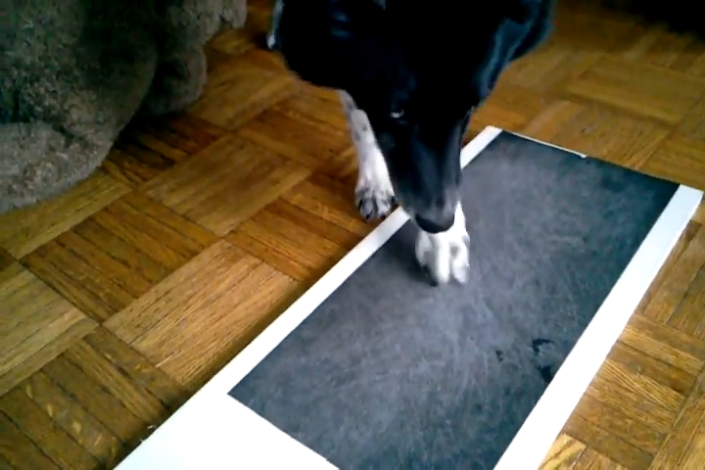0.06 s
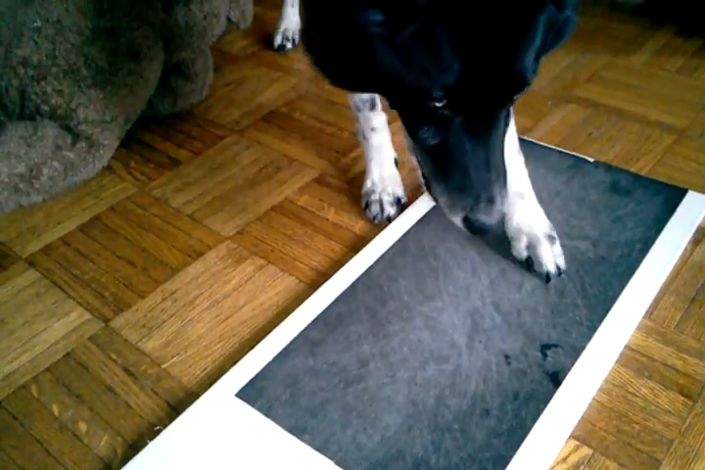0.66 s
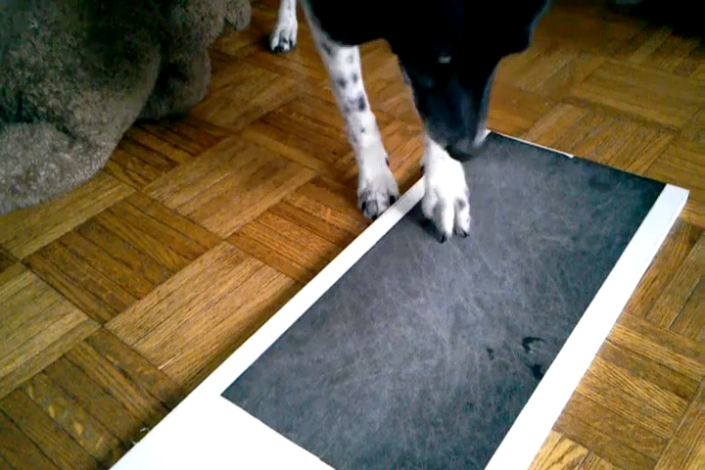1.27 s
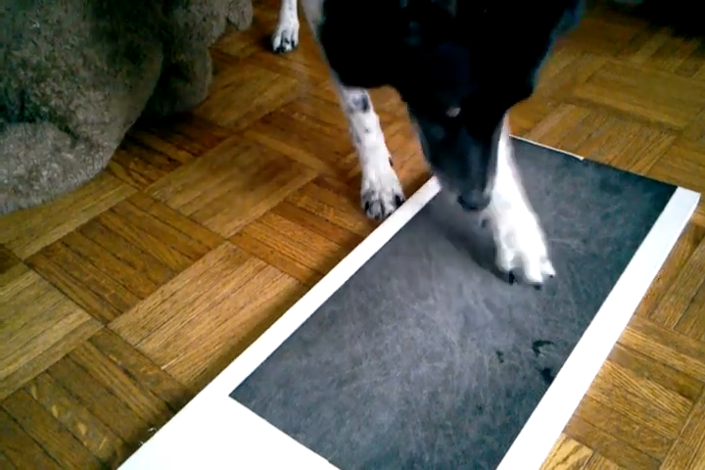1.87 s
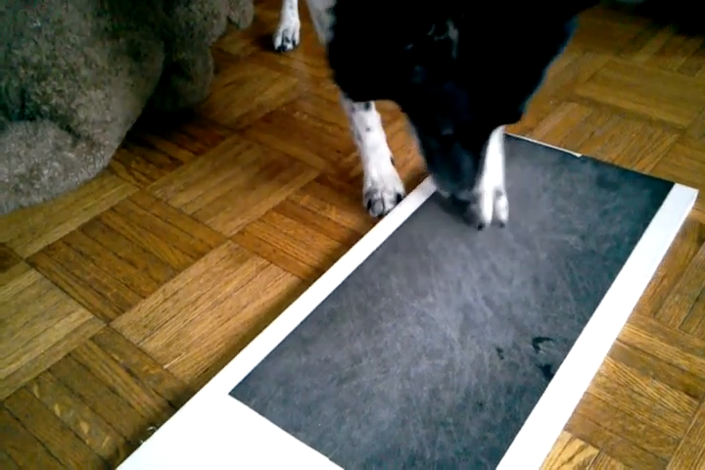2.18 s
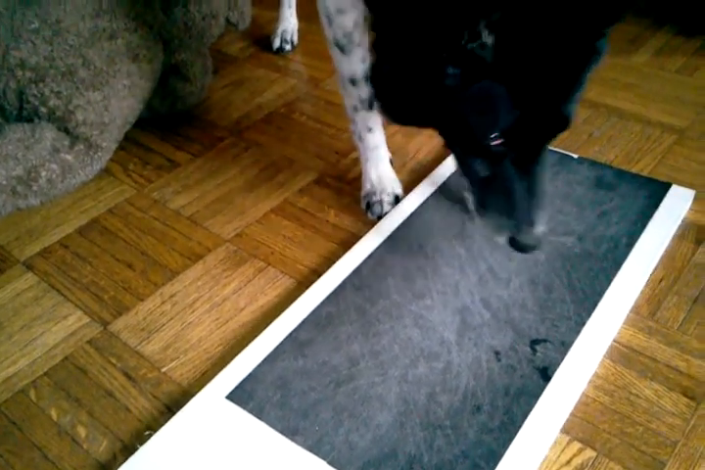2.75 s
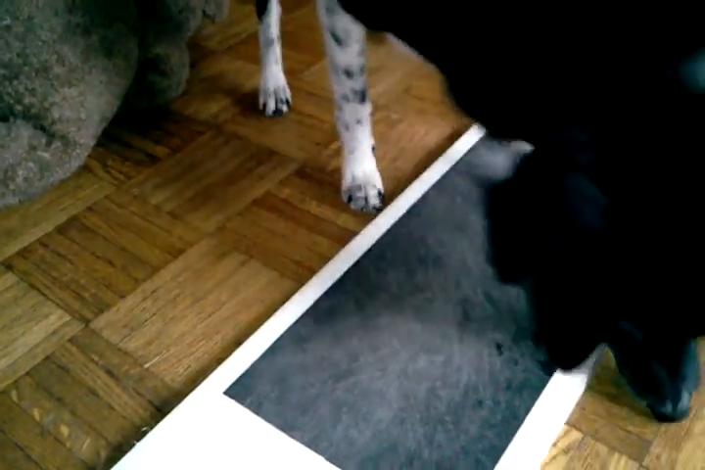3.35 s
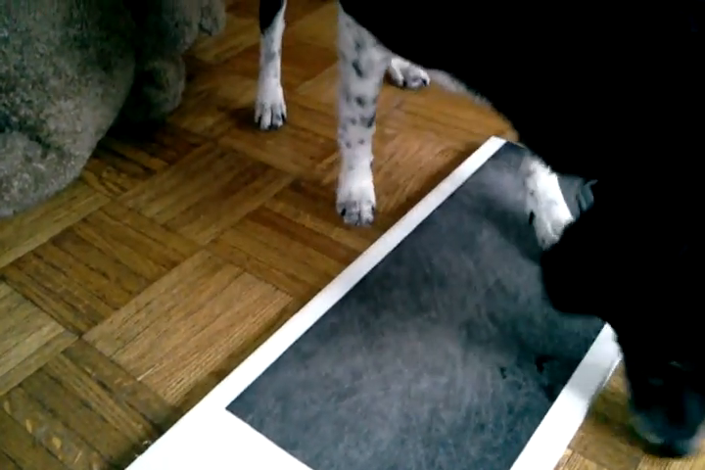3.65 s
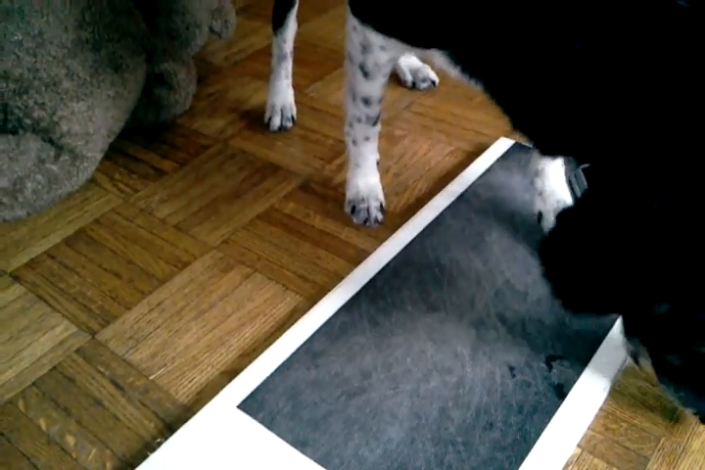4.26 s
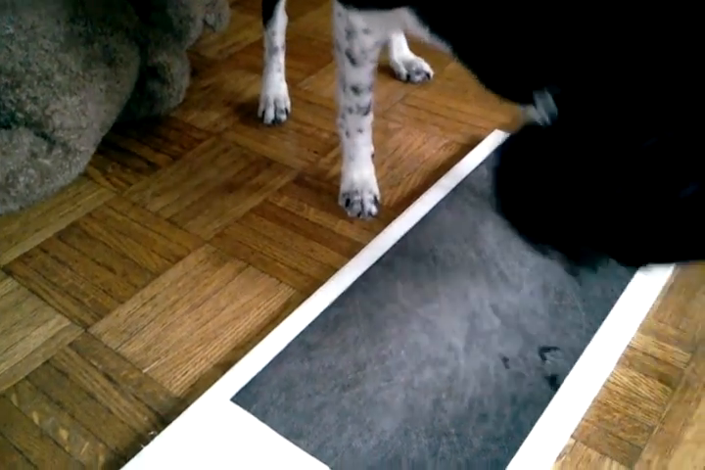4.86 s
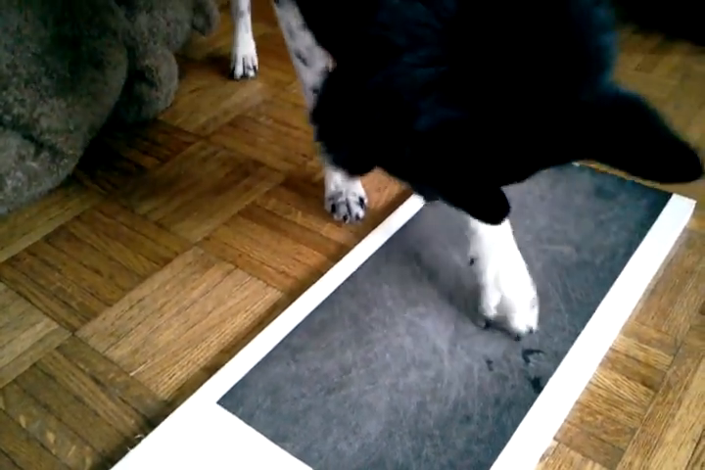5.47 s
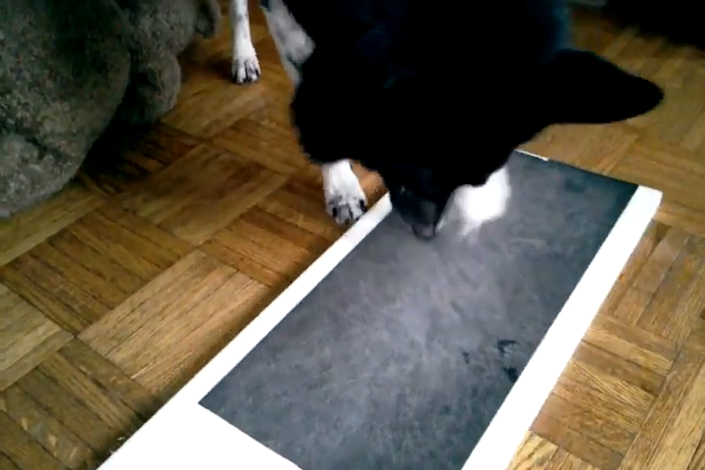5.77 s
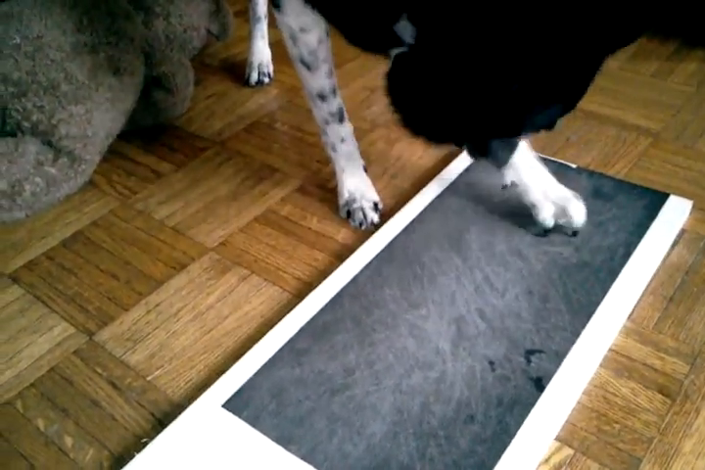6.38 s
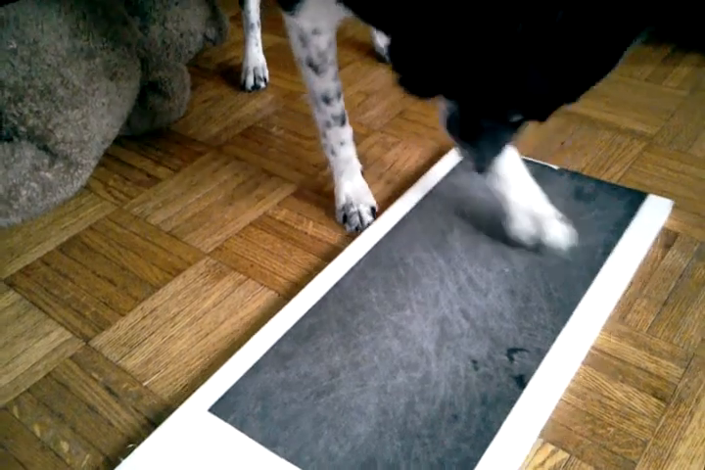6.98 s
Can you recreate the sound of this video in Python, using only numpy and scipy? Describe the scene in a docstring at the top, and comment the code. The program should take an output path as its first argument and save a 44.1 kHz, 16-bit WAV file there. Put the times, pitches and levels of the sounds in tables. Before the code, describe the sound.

A dog scratches one paw over a sandpaper board in two bouts of quick gritty scrapes and claw taps, in a small room.

```python
"""A small room with a parquet floor: a dog rakes one front paw over a sandpaper-covered board, in two bouts.
The claws tap down, grind through the grit in quick slips that set the board ringing, then brush off.
The pads rub softly. The room rings briefly over a steady rumble and hiss.
The hardest strokes overload a narrow-band microphone."""
import sys
import numpy as np
from scipy import signal
from scipy.fft import rfft, irfft
from scipy.io import wavfile

SR = 44100
rng = np.random.default_rng(int(sys.argv[2]) if len(sys.argv) > 2 else 0)


def dump(signal):
    """Clip the signal to [-1, 1] and save it as 16-bit WAV at the path in sys.argv[1]."""
    limited = np.clip(np.atleast_2d(signal).T, -1, 1)
    pcm = np.round(limited * 32767).astype(np.int16)
    wavfile.write(sys.argv[1], SR, pcm)


N = 310023

# Background spectrum. Each row: frequency in Hz, relative density in dB.
BACKGROUND_SPECTRUM = [(12, -38), (20, -12), (131, -5), (160, -5), (307, -13), (348, -11.5), (405, -13),
                       (605, -14), (652, -17.5), (950, -12), (1100, -17), (1190, -14.5), (2120, -23),
                       (4490, -26.5), (8000, -34.5), (10400, -71), (17600, -120)]
# Room decay. Each row: frequency in Hz, time to fall 60 dB in seconds.
ROOM_DECAY = [(300, 0.49), (800, 0.41), (2100, 0.31), (5500, 0.3), (8000, 0.32)]
# Board modes. Each row: centre in Hz, width in Hz, relative level in dB.
BOARD_MODES = [(635, 96, -0.5), (796, 270, -8.5), (885, 54, -8), (1027, 157, -2), (1160, 47, -16),
               (1353, 120, -5.5), (1470, 98, -8.5), (1704, 114, -5), (1730, 250, -4.5), (1953, 320, 0),
               (2210, 102, -4.5), (2670, 195, 1), (2980, 230, -8.5)]
# Colour of a claw on grit. Each row: frequency in Hz, relative level in dB.
CLAW_SPECTRUM = [(100, -22), (600, -38.5), (1500, -7), (2400, -3.5), (3100, -5.5), (3400, -6.5), (3750, -1),
                 (4100, -1.5), (4550, 0.5), (5100, 1), (5650, -10), (6200, -12.5), (7100, -15),
                 (8200, -26.5)]
# A claw strikes or snaps free. Each row: start in seconds, relative strength in dB,
# board ring offset in dB, claw pitch in Hz.
CLAW_TAPS = [(.0974, -22, -18, 5200), (.2585, -8.5, -17, 4630), (0.3743, -6.5, -1.5, 5000),
             (.3842, -7, -14, 5000), (0.7777, -10, -16, 4800), (.9529, -1.5, -4, 5300),
             (0.963, -9, -22, 5100), (0.9849, 6, -23, 4900), (1.1902, -1, -6, 4950),
             (1.3835, -13.5, -23, 4900), (1.5123, 2, -1, 5400), (1.5155, -1, -17, 4500),
             (1.523, -5, -18, 4700), (1.535, -2, -3, 4600), (1.9135, -18, 1, 4480),
             (1.9166, -4, -0.5, 4330), (1.931, -6.5, -3.5, 4400), (1.9909, 1, -17, 4920),
             (2.0174, -5, 4, 4500), (2.2712, -7.5, -25, 4700), (2.377, -10.5, 0, 4370),
             (2.382, -2, 0, 4850), (2.402, 0, -14, 5000), (2.4074, 1, -19, 4940), (2.4204, -1, -10, 4960),
             (2.5683, -0.5, 1.5, 5100), (2.607, -8, 3, 4740), (2.8442, -9, -24, 5000),
             (2.8494, -10, -13, 5000), (2.9797, -23, -11, 3380), (3.0017, -24, -9, 5130),
             (3.1033, -16.5, -8, 4720), (3.169, -20, -17, 4100), (3.243, -25, -12, 4600),
             (3.4111, -29, -12, 4700), (5.447, -15.5, 2.5, 4800), (5.4695, -8.5, -4, 4500),
             (5.4989, -10, -19, 4600), (5.5333, -4, -1.5, 4500), (5.678, -1, 0, 4200),
             (5.747, -17.5, 2, 5100), (5.9297, -14, -2, 4100), (5.9574, -12, -2, 5000),
             (6.0152, -7, 4, 3900), (6.1165, 1.5, 0, 4300), (6.1585, -1, 2, 4400), (6.2044, -5.5, 5, 4970),
             (6.3984, -12.5, -1.5, 5000), (6.4089, -4.5, -5, 5300), (6.4362, -5, -18, 5000),
             (6.4607, -5, 1.5, 4900), (6.4792, -2, 5, 2900), (6.5174, 4, -9, 4900),
             (6.5901, -0.5, 2.5, 3600), (6.6045, -3.5, 5, 4970), (6.686, -9.5, -24, 4540),
             (6.8617, -3, -16, 5500), (6.8659, 2, -7, 4500), (6.9132, -0.5, -15, 4600),
             (6.9364, 1, -27, 5400), (6.977, -4, -19, 4400)]
# The lifted paw grazes the grit. Each row: start and length in seconds, relative claw rasp and
# board ring in dB, swell in dB, pitch the board favours in Hz.
PAW_BRUSHES = [(.174, 0.1, -25, -31.5, 0.5, 1680), (0.784, .067, -29.5, -41, 10, 1720),
               (1.381, 0.024, -30, -34, 6, 1800), (1.74, .02, -19, -20, -5, 1500),
               (1.759, 0.0363, -12.5, -29, -4, 1580), (2.232, 0.043, -29, -35.5, 3, 1810),
               (2.802, 0.04, -27.5, -34.5, -9.5, 1780), (3.42, .09, -44, -43.5, -2, 700),
               (5.319, 0.04, -38.5, -46, -9, 1230), (5.496, 0.048, -21.5, -33, 16, 1630),
               (5.759, 0.049, -25.5, -21.5, 1, 1110), (5.928, .016, -16.5, -18, 0, 1410),
               (5.957, 0.014, -23, -28, 13, 1440), (6.413, 0.065, -26.5, -24.5, 16, 1310),
               (6.688, 0.023, -21.5, -34, -3, 1630), (6.87, 0.15, -23, -32, 3, 1670)]
# The paw digs in and drags back. Each row: start, length, press time and ease time in seconds,
# relative claw rasp, board ring and pad rub in dB, fraction of the stroke where the pads lie flattest,
# load gained in dB, base pitch the board favours in Hz.
PAW_STROKES = [(0.0, 0.12, 0.0033, 0.08, -14.5, -10.5, -29, 0.44, 2, 1380),
               (.994, 0.18, 0.14, 0.021, -12, -8.5, -27, 0.82, 5, 1280),
               (1.534, 0.21, 0.034, 0.02, -12.5, -10.5, -26, 1, 11, 1360),
               (1.964, 0.17, 0.11, 0.061, -13.5, -10, -28, 0.54, 7.5, 1470),
               (2.411, 0.17, 0.063, 0.012, -16, -13.5, -29.5, .45, 6, 1270),
               (5.546, 0.14, 0.029, 0.04, -14.5, -10.5, -30.5, 0.62, 3.5, 1280),
               (5.972, 0.31, 0.15, .06, -17.5, -12.5, -28, 0.89, -2.5, 1320),
               (6.476, .110, 0.04, 0.032, -12, -7.5, -30, 0.63, 5, 1650),
               (6.974, 0.069, 0.051, 0.0045, -16.5, -12.5, -27, 0.46, 0, 1580)]
# The paw crosses the board. Each row: fraction of the stroke, ratio of favoured pitch to base pitch.
PAW_TRAVEL = [(0, 1.07), (.45, 0.83), (1, 1.21)]


def amp(db):
    """Decibels to gain."""
    return 10 ** (np.asarray(db) / 20)


def unit_rms(x):
    """Scale to an rms of 1."""
    return x / np.sqrt(np.mean(x ** 2) + 1e-20)


def lookup(table, hz):
    """Interpolate on a log-frequency axis."""
    table_hz, values = np.transpose(table)
    return np.interp(np.log(hz + 1), np.log(table_hz), values)


def add(mix, start_s, sound):
    """Mix a sound in at start_s."""
    part = mix[max(round(start_s * SR), 0):][:len(sound)]
    part += sound[:len(part)]


def lowpass(x, hz, size):
    """Steep FIR low-pass."""
    return signal.oaconvolve(x, signal.firwin(size, hz, window=("kaiser", 9), fs=SR), "same")


def minimum_phase(gain):
    """Causal response of energy 1 from a two-sided gain spectrum."""
    log_spectrum = np.conj(signal.hilbert(np.log(gain + 1e-6)))
    ring = np.fft.ifft(np.exp(log_spectrum)).real
    return ring / np.linalg.norm(ring)


def mode_power(hz, centre_hz, width_hz):
    """Power response of one mode, peak 1."""
    return 1 / (1 + ((hz ** 2 - centre_hz ** 2) / (width_hz * hz + 1)) ** 2)


def swept_resonance(x, hz, width_hz):
    """Unity-gain resonance that follows the curve hz."""
    carrier = np.exp(2j * np.pi * np.cumsum(hz) / SR)
    pole = np.exp(-np.pi * width_hz / SR)
    return 2 * (carrier * signal.lfilter([1 - pole], [1, -pole], x / carrier)).real


def background(level_db=-43):
    """Steady room rumble and microphone hiss."""
    gain = amp(lookup(BACKGROUND_SPECTRUM, np.fft.rfftfreq(N, 1 / SR)))
    return amp(level_db) * unit_rms(irfft(rfft(rng.standard_normal(N)) * gain, N))


def room(x, early_db=-16, early_s=0.016, tail_db=-13, tilt_db_per_oct=-2, echoes_per_s=3000, size=22050):
    """Early reflections off floor and furniture, then a short, duller tail."""
    t = np.arange(size) / SR
    echoes = rng.standard_normal(size) * (rng.random(size) < echoes_per_s / SR) * (t > 0.003)
    early = echoes * np.exp(-t / early_s)
    hz, age_s, spectra = signal.stft(echoes, SR, nperseg=256)
    fade_db = -60 * age_s / lookup(ROOM_DECAY, hz)[:, None]
    tilt_db = tilt_db_per_oct * np.log2(np.maximum(hz / 1100, 1))[:, None]
    untilted = signal.istft(spectra * amp(fade_db), SR, nperseg=256)[1][:size]
    tail = signal.istft(spectra * amp(fade_db + tilt_db), SR, nperseg=256)[1][:size]
    response = amp(early_db) * early / np.linalg.norm(early)
    response += amp(tail_db) * tail / np.linalg.norm(untilted)
    return signal.oaconvolve(x, response)[:N]


def pad_ring(centre_hz=390, width_hz=260, size=4096):
    """Dull response of the soft paw pads."""
    hz = abs(np.fft.fftfreq(size, 1 / SR))
    return minimum_phase(mode_power(hz, centre_hz, width_hz))


def board_ring(low_hz=575, high_hz=3400, place_db=3, thud_db=-23, order=14, size=4096):
    """Board response: each place favours other modes, and the bass radiates poorly."""
    hz = abs(np.fft.fftfreq(size, 1 / SR))
    lifts_db = rng.uniform(-place_db, place_db, len(BOARD_MODES))
    power = sum(amp(db + lift_db) ** 2 * mode_power(hz, centre_hz, width_hz)
                for (centre_hz, width_hz, db), lift_db in zip(BOARD_MODES, lifts_db))
    power /= 1 + (low_hz / (hz + 1)) ** order + (hz / high_hz) ** order
    thud = amp(thud_db) ** 2 * mode_power(hz, centre_hz=342, width_hz=134)
    return minimum_phase(np.sqrt(power + thud))


def claw_ring(pitch_hz=5000, tone_db=-30, width_hz=1200, size=4096):
    """Claw response to one grain; tone_db adds the ring of a claw struck alone."""
    hz = abs(np.fft.fftfreq(size, 1 / SR))
    tone = amp(tone_db) ** 2 * mode_power(hz, pitch_hz, width_hz)
    return minimum_phase(amp(lookup(CLAW_SPECTRUM, hz)) * np.sqrt(1 + tone))


def grit(size, grains_per_s=7000, spread_db=3):
    """Tiny uneven clicks as sharp grains cut the claw."""
    clicks = amp(spread_db * np.minimum(rng.exponential(1, size), 4))
    clicks *= rng.choice([-1, 1], size)
    return unit_rms(clicks * (rng.random(size) < grains_per_s / SR))


def slips(t, early_per_s=200, late_per_s=100, jitter=0.2133, spread_db=2, skid_s=0.0008):
    """Stick and slip: several claws catch at first, then the paw settles into slower chatter."""
    settled_s = 0.4 * t[0] + 0.6 * t[-1]
    cycles = np.cumsum(np.interp(t, [t[0], settled_s], [early_per_s, late_per_s])) / SR
    gap, strength = rng.standard_normal((200, 2)).T
    onsets = np.searchsorted(cycles, np.cumsum(np.exp(jitter * gap)) - 1)
    inside = onsets < len(t)
    kicks = np.zeros(len(t))
    kicks[onsets[inside]] = amp(spread_db * np.clip(strength, -2, 2))[inside]
    age = (t - t[0]) / skid_s
    skid = age ** 2 * np.exp(-age)
    return unit_rms(signal.fftconvolve(kicks, skid)[:len(t)])


def scrape(t, levels_db, favoured_hz, slip_share, edge_s):
    """Grit drives claws, board and, given a third level, pads; slip_share is (at start, at end)."""
    out = np.zeros(N)
    share = np.linspace(*slip_share, len(t))
    force = np.sqrt(1 - share + share * slips(t) ** 2)
    contact = np.clip(np.minimum(t - t[0], t[-1] - t) / edge_s, 0, 1)
    drive = unit_rms(force * grit(len(t))) * contact
    # The paw's place sets which modes answer best.
    board_drive = drive + swept_resonance(drive, favoured_hz, width_hz=420)
    parts = (drive, claw_ring()), (board_drive, board_ring()), (drive, pad_ring())
    for level_db, (push, ring) in zip(levels_db, parts):
        add(out, t[0], signal.fftconvolve(push * amp(level_db), ring))
    return out


def brushes(claw_db=-4, board_db=-6):
    """Only the claw tips graze the grit, swelling or fading evenly."""
    out = np.zeros(N)
    for start_s, length_s, rasp_db, ring_db, swell_db, hz in PAW_BRUSHES:
        t = np.arange(0, length_s, 1 / SR)
        load_db = swell_db * (t / length_s - 0.5)
        levels_db = claw_db + rasp_db + load_db, board_db + ring_db + load_db
        out += scrape(start_s + t, levels_db, np.full(len(t), hz), slip_share=(0.6, 0.6), edge_s=0.0016)
    return out


def taps(claw_db=11, board_db=9, skid_s=0.00095, contact_db=-5, size=400):
    """First contact, then a brief skid over grains: the claw ticks, the board knocks."""
    out = np.zeros(N)
    age = np.arange(size) / SR / skid_s
    for start_s, strength_db, ring_db, pitch_hz in CLAW_TAPS:
        blow = grit(size, grains_per_s=12000, spread_db=-0.5) * age * np.exp(-age)
        blow[0] = amp(contact_db) * np.linalg.norm(blow)
        tick = signal.fftconvolve(blow, claw_ring(pitch_hz, tone_db=7))
        knock = signal.fftconvolve(blow, board_ring())
        add(out, start_s, amp(strength_db + claw_db) * tick / np.linalg.norm(tick))
        add(out, start_s, amp(strength_db + ring_db + board_db) * knock / np.linalg.norm(knock))
    return out


def strokes(board_db=-1, pad_db=-6, touch_db=-13, lift_db=-10.5, roll_db_per_stroke=-22.5):
    """Paw load builds, holds and eases; rasp and ring follow it, and the pads rub as the paw rolls."""
    out = np.zeros(N)
    for start_s, length_s, press_s, ease_s, rasp_db, ring_db, rub_db, flattest, lean_db, hz in PAW_STROKES:
        t = np.arange(0, length_s, 1 / SR)
        along = t / length_s
        landing = np.maximum(1 - t / press_s, 0)
        leaving = np.maximum(1 - (length_s - t) / ease_s, 0)
        load_db = touch_db * landing ** 2 + lift_db * leaving ** 2 + lean_db * (along - 0.5)
        levels_db = (rasp_db + 0.49 * load_db,  # claws bite at once, so load matters less
                     board_db + ring_db + load_db,
                     pad_db + rub_db + roll_db_per_stroke * abs(along - flattest))
        favoured_hz = hz * np.interp(along, *np.transpose(PAW_TRAVEL))
        out += scrape(start_s + t, levels_db, favoured_hz, slip_share=(0.54, 0.9), edge_s=0.00033)
    return out


def scene(paths=3, sway_hz=0.907):
    """Paw, echoes and background; as the dog sways, the paths through the room keep changing."""
    paw = strokes() + brushes() + taps()
    sway_rad = np.pi * sway_hz * np.arange(N) / SR
    weights = [np.sqrt(2 / paths) * np.cos(sway_rad + np.pi * k / paths) for k in range(paths)]
    echoes = sum(room(paw * weight) for weight in weights)
    return (paw + echoes + background())[None]


def record(dry):
    """A narrow-band input overloads; its filter overshoot is clipped again, then band-limited."""
    overloaded = np.clip(dry[0], -0.76, 0.76)
    narrow = lowpass(overloaded, hz=8350, size=127)
    clipped = np.clip(narrow, -0.73, 0.73)
    return lowpass(clipped, hz=16300, size=511)[None]


dry = scene()
out = record(dry)
dump(out)
```